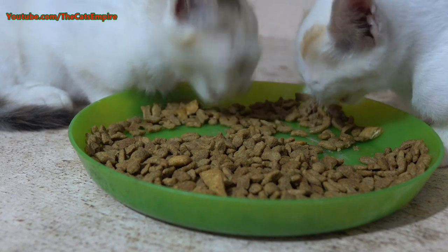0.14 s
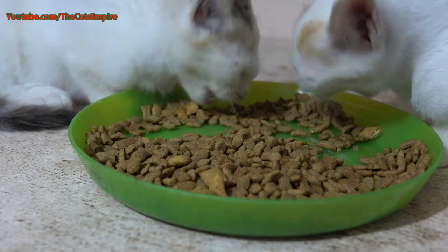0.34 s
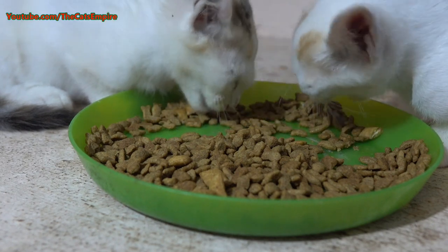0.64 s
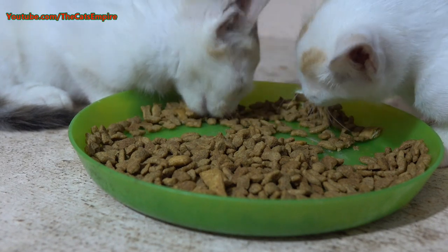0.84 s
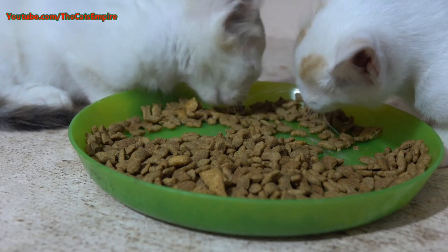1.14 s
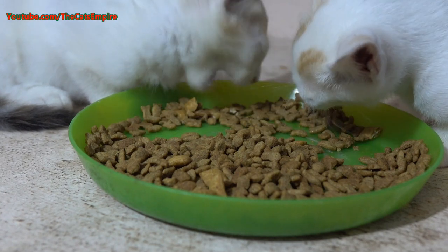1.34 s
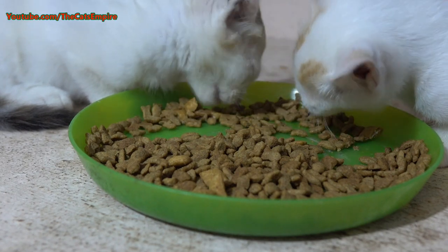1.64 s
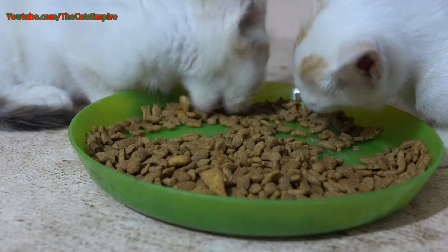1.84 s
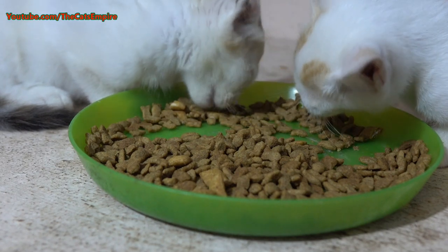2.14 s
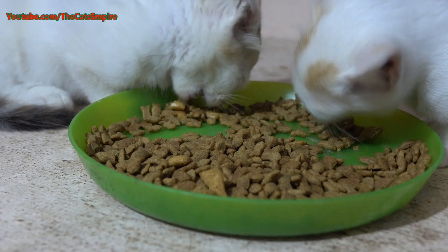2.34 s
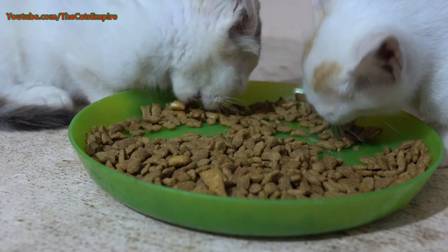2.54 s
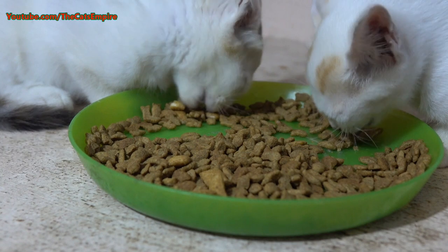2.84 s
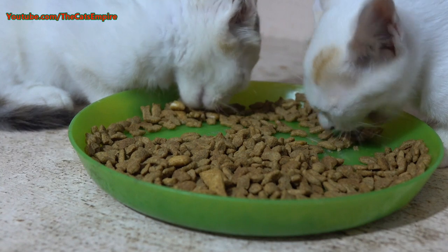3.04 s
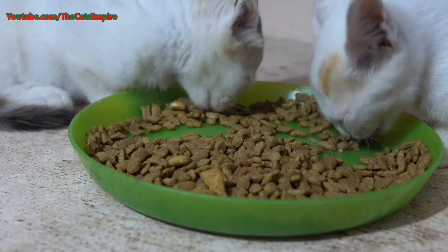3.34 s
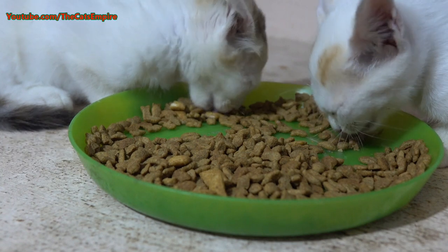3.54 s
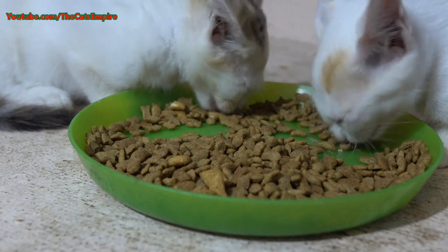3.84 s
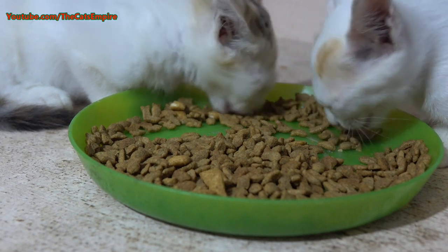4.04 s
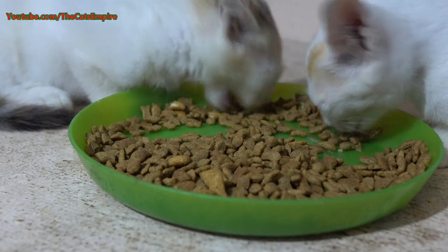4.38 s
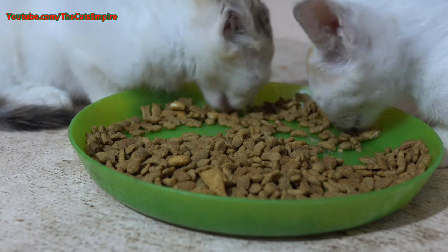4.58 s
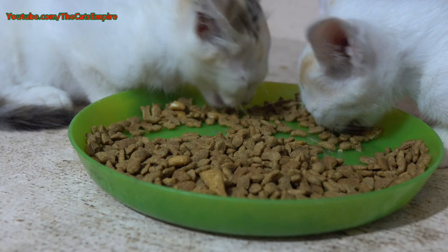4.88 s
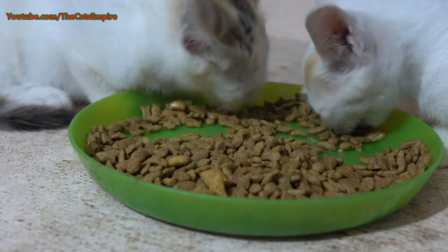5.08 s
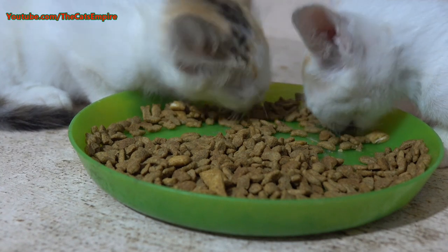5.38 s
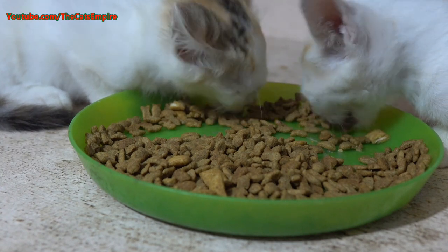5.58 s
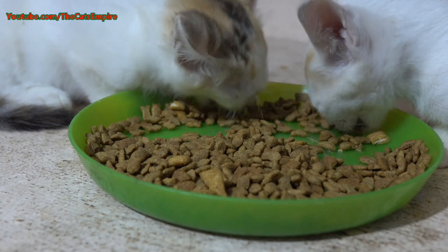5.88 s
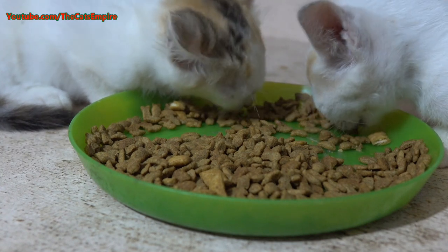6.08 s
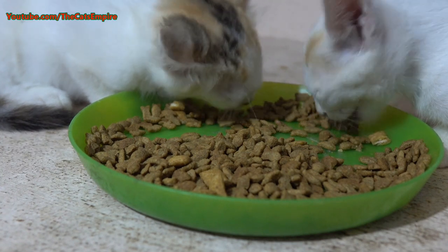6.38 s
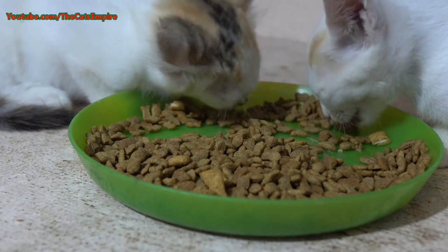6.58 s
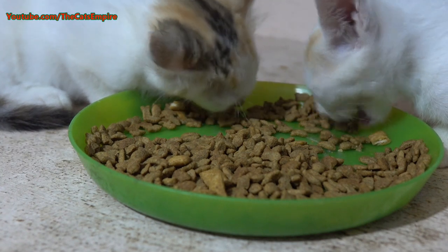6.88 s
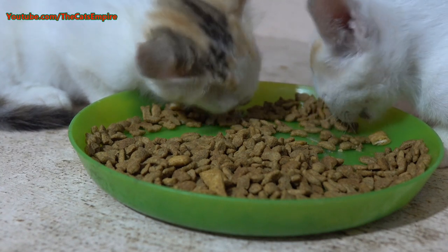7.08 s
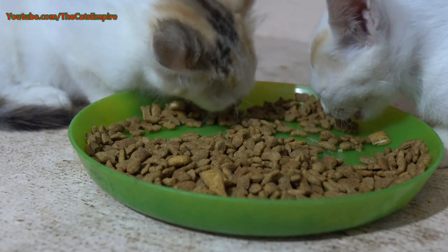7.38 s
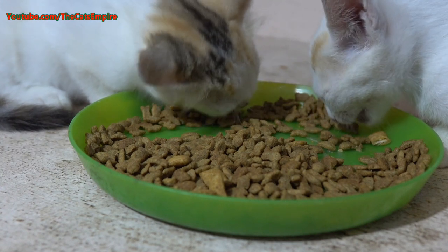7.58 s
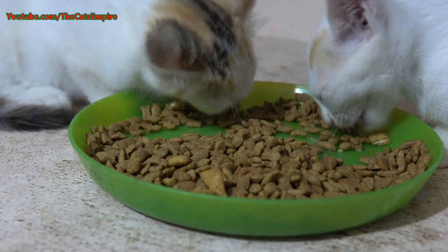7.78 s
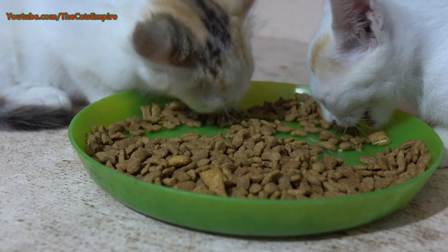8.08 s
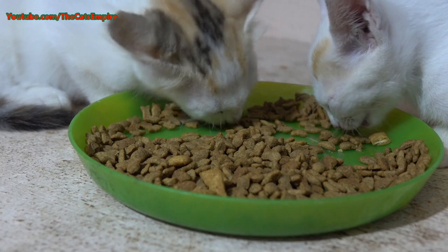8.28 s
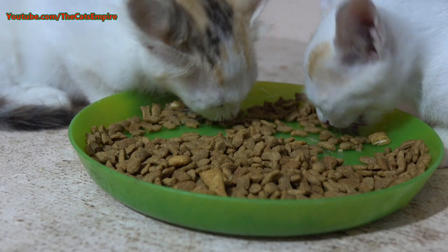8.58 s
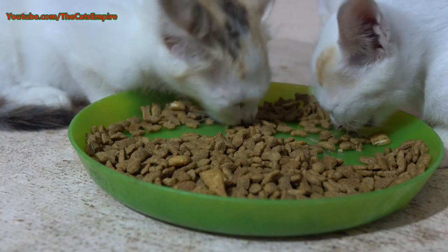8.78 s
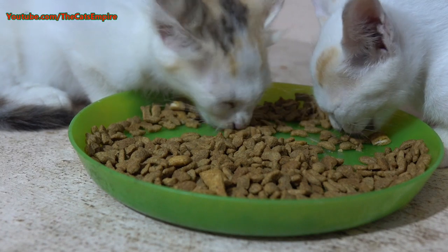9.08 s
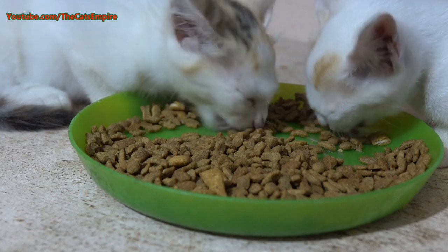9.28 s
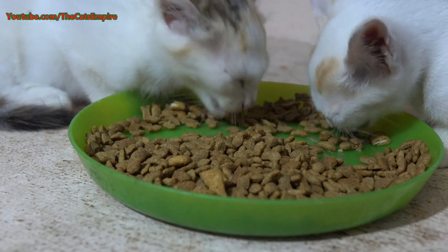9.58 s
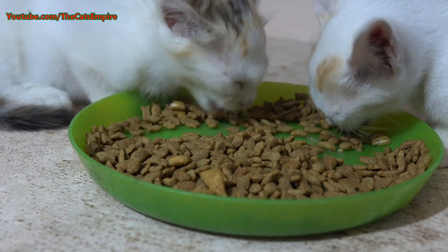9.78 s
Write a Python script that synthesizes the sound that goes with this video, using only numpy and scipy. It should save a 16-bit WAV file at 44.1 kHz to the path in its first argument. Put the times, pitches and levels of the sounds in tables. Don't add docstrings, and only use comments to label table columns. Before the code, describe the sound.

Loud, overloaded snaps of dry pellets between small teeth, gritty grinding and dull plastic plate knocks, thinning midway, then a final burst of bites.

```python
import sys
import numpy as np
from scipy import signal
from scipy.io import wavfile
from scipy.ndimage import uniform_filter1d

SR = 44100
rng = np.random.default_rng(int(sys.argv[2]) if len(sys.argv) > 2 else 0)


def int16_out(signal):
    q = np.round(np.clip(np.atleast_2d(signal).T, -1, 1) * 32767)
    wavfile.write(sys.argv[1], SR, q.astype(np.int16))


def rack_gain(trim_db):
    fader = np.asarray(trim_db, float)
    return 10 ** (fader / 20)


N = 437472

# start in seconds, peak level in dB, ring pitch in Hz,
# splinter brightness in dB.
BITES = [(0.181, 3, 3030, -22.5), (0.202, 11.5, 2900, -4.5), (0.298, 0.5, 3430, -11),
         (0.329, 10.5, 3550, -9), (0.352, 8, 2170, 0.5), (1.009, 7, 2840, -10.5), (1.37, 9, 2100, -3.5),
         (1.422, 0.5, 2800, -7), (1.484, 12, 3550, -8), (1.83, 1, 2740, -4.5), (1.882, 4, 3240, -15),
         (1.91, 9, 3760, -12), (2.2421, 9.5, 4000, -7.5), (2.2528, 12, 3980, -15.5), (2.663, 6.5, 2940, -9),
         (2.785, -2, 3000, -6.5), (3.2309, 11.5, 2404, -8.5), (5.543, 5, 4440, -11), (5.978, 4.5, 3400, -8),
         (6.352, 16, 3190, -6), (7.093, 11, 2670, 1), (7.269, 6, 2700, -13), (8.672, 7.5, 3560, -12),
         (9.226, 4, 2360, -13), (9.321, 0, 2170, -3.5), (9.349, -3, 1980, 6), (9.44, -1.5, 3170, -19),
         (9.64, 6, 2460, -16), (9.681, 7.5, 2550, -7.5), (9.743, 10.5, 2170, -5.5)]


def rms_one(x):
    return x / np.sqrt(np.mean(x ** 2) + 1e-20)


def peak_one(x):
    return x / np.abs(x).max(axis=-1, keepdims=True)


def above(x, hz):
    return signal.sosfilt(signal.butter(4, hz, "high", fs=SR, output="sos"), x)


def below(x, hz):
    return signal.sosfilt(signal.butter(4, hz, "low", fs=SR, output="sos"), x)


def at_hz(points, hz):
    curve_hz, value = np.transpose(points)
    return np.interp(np.log(hz), np.log(curve_hz), value)


def drift(rate):
    r = np.exp(-80 * np.pi * rate / SR)
    coarse = rng.standard_normal(N // 40 + 2002)
    slow = signal.lfilter([1], [1, -2 * r, r * r], coarse)[2000:]
    return np.interp(np.arange(N) / 40, np.arange(len(slow)), rms_one(slow))


def ring(clicks, hz, t60):
    r, w = np.exp(-np.log(1000) / (t60 * SR)), 2 * np.pi * hz / SR
    return signal.lfilter([0, np.sin(w)], [1, -2 * r * np.cos(w), r * r], clicks + 1e-18)


def bands(x, spectrum):
    for k, low in enumerate(22 * np.sqrt(2) ** np.arange(19)):
        sos = signal.butter(2, [low, low * np.sqrt(2)], "band", fs=SR, output="sos")
        hz = low * 1.19
        if spectrum[0][0] < hz < spectrum[-1][0]:
            gain = (-1) ** k * rack_gain(at_hz(spectrum, hz))
            yield hz, gain * signal.sosfilt(sos, x + 1e-18)


def coloured(x, spectrum):
    return sum(band for hz, band in bands(x, spectrum))


def stroke(s, held, level_db, rise_db_s, fall_db_s):
    since = np.arange(0, N + 128, 128)[:, None] / SR - s
    building = rise_db_s * np.maximum(-since - held / 2, 0)
    easing = fall_db_s * np.maximum(since - held / 2, 0)
    power = np.sum(rack_gain(2 * (level_db - building - easing)), axis=1)
    return np.interp(np.arange(N) / 128, np.arange(len(since)), power)


def hush():
    # pitch in Hz, density in dB per Hz.
    room_colour = [(60, -2.5), (120, -14.5), (450, -12), (1000, -17.5), (4000, -19.5), (8000, -14.5),
                   (12000, -22), (15800, -27)]
    hiss_hz, mains_hz = 7400, 100
    white = rng.standard_normal(N)
    noise = sum(band * rack_gain(4.4 * drift(5.3)) for hz, band in bands(white, room_colour))
    narrow = ring(ring(white, hiss_hz, .012), hiss_hz, .012)
    hiss = rack_gain(-76 + 2 * drift(3)) * rms_one(narrow)
    hum = rack_gain(-80 + 2.4 * drift(2)) * np.sin(2 * np.pi * mains_hz * np.arange(N) / SR)
    return rack_gain(-64) * rms_one(noise) + hiss + hum


def rustle():
    # time in seconds, level in dB.
    busy = [(0.0, -47.5), (0.94, -53.5), (1.46, -56), (4.36, -47), (4.62, -65.5), (5.17, -56), (5.31, -47),
            (6.44, -59), (6.93, -59), (7.21, -39.5), (7.46, -53), (8.67, -49.5), (9.2, -57), (9.92, -42)]
    white = rng.standard_normal(N)
    tongue = sum(rms_one(ring(white, hz, .006)) * rack_gain(7 * drift(9)) for hz in (1100, 2300, 3400, 4400))
    fur = below(above(white, 1100), 4900)
    brush = .3 * fur + .3 * rms_one(below(above(tongue, 900), 5200))
    air = rack_gain(-24.0 + 4.0 * drift(5)) * below(above(white[::-1], 7000), 9500)
    air += rack_gain(-31.5 + 4.0 * drift(5)) * above(white, 11500)
    level_db = np.interp(np.arange(N) / SR, *np.transpose(busy)) - 6.5
    return (rms_one(brush) * rack_gain(6.5 * drift(36)) + air) * rack_gain(level_db)


def grains(per_s, spread_db):
    sizes = rack_gain(spread_db * np.minimum(rng.exponential(1, N), 4)) * np.sign(rng.random(N) - .5)
    return sizes * (rng.random(N) < per_s / SR)


def rattle(per_s, span_hz, turns, count=6):
    low, high = span_hz
    clicks, dealt = grains(per_s, spread_db=2.8), rng.integers(0, count, N)
    rings = np.zeros(N)
    for k, hz in enumerate(np.geomspace(low, high, count)):
        rings += ring(clicks * (dealt == k) * rack_gain(5.5 * drift(5)), hz, turns / hz)
    tick = below(above(clicks, low), min(2.5 * low, 14000))
    return rms_one(below(above(rings, low * .8), high * 1.1) + .7 * tick)


def grinding():
    # middle in seconds, hold in seconds, crumb level in dB,
    # level in dB of pellets sliding on the plate.
    chews = [(0.03, 0.13, -39.5, -57), (0.672, 0.13, -37, -32.5), (1.28, 0.29, -44, -37),
             (1.7, 0.15, -55, -52), (1.81, 0.1, -30, -31), (2.13, 0.11, -42.5, -46.5),
             (5.266, 0.015, -35.5, -32), (2.57, 0.18, -45.5, -71.5), (3.06, 0.065, -31, -36),
             (3.492, 0.032, -39.5, -52.5), (3.592, 0.0068, -51.5, -30.5), (3.761, 0.049, -36.5, -43),
             (3.942, 0.037, -31, -42), (4.17, 0.13, -46.5, -57), (4.352, 0.17, -42.5, -44),
             (4.968, 0.018, -41, -55), (5.227, 0.033, -33.5, -29.5), (5.37, 0.012, -39, -34.5),
             (5.678, 0.017, -39, -43), (5.921, 0.072, -48, -76), (6.117, 0.49, -46.5, -50),
             (6.6, 0.19, -39.5, -44), (7.0, 0.054, -50.5, -54), (7.569, 0.017, -54.5, -53.5),
             (7.75, 0.17, -48, -77), (8.25, 0.19, -54, -50), (8.078, 0.029, -42, -39),
             (8.429, 0.21, -70, -75), (8.85, 0.034, -67, -31.5), (8.915, 0.031, -33, -26),
             (8.99, 0.012, -33, -40), (9.062, 0.013, -42, -27.5), (9.16, 0.03, -33, -24)]
    s, held, crumb_db, slide_db = np.transpose(chews)
    bite_s, bite_db = np.transpose(BITES)[:2]
    rise_db_s, fall_db_s = 500, 360
    debris = stroke(bite_s + 0.023, 0, bite_db, 3000, 200.5)
    crush = stroke(s, held, crumb_db, rise_db_s, fall_db_s) + rack_gain(2 * -45) * debris
    shove = stroke(s, held, slide_db, rise_db_s, fall_db_s) + rack_gain(2 * -47) * debris
    clump = rack_gain(5 * drift(22))
    dust = rattle(200 * clump, (7500, 13500), turns=25, count=3)
    crumbs = rattle(1000 * clump, (2600, 5900), turns=7) + rack_gain(-24) * dust
    slides = rattle(3000 * np.sqrt(clump), (1050, 2700), turns=8)
    idle_crumb_db, idle_slide_db = -66, -74
    crumbs = rack_gain(-4.5) * crumbs * np.sqrt(crush + rack_gain(2 * idle_crumb_db))
    return crumbs + rack_gain(-8.5) * slides * np.sqrt(shove + rack_gain(2 * idle_slide_db))


def plate(size=260):
    # start in seconds, peak level in dB,
    # thud into the floor in dB, extra ring of the rim in dB.
    knocks = [(0.036, -51, -28, 2.5), (0.18, -24, -64.5, -12), (0.294, -26, -24, -4),
              (0.35, -19, -5.5, -1.5), (0.692, -34, -43, -3.5), (1.005, -27, -20.5, -9),
              (8.088, -41, -33, -22), (1.33, -32, -44.5, 4.5), (1.368, -23, -22.5, -4.5),
              (1.418, -29.5, -13, -1.5), (1.483, -29, -45, -3), (1.828, -30.5, -71, -9.5),
              (1.9, -30, -23, 6), (2.239, -32, -43, -2), (2.661, -28.5, -21, 6.5), (2.78, -32.5, -44, -8),
              (3.23, -23, -29.5, 8), (4.284, -55, -40, 10), (4.755, -45, -38, 7.5),
              (5.538, -41, -4.5, -1.5), (6.349, -21.5, 0.5, 0.5), (6.641, -38.5, -11, -6.5),
              (7.092, -23, 1, -6), (7.263, -25.5, -19.5, -3.5), (8.669, -31.5, -33, 7.5),
              (8.814, -37.5, -9.5, 4.5), (9.225, -30, -7, -4), (9.344, -21.5, -5, 1.5),
              (9.679, -27.5, 7.5, 3.5), (9.74, -19, -53, -5)]
    # pitch in Hz, level in dB, t60 in seconds.
    modes = [(251.4, -5, 0.29), (260, -6, 0.12), (306, -6, 0.15), (440, -8, 0.05), (496, -7.5, 0.27),
             (567, -3, 0.11), (707, 0, 0.044), (1090, -7.5, 0.32)]
    s, peak_db, thud_db, rim_db = np.transpose(knocks)
    at = np.round((s + .003) * SR).astype(int)
    share_db = rng.normal(0, 2.8, (len(s), len(modes)))
    body, push, thump = np.zeros((3, N))
    for k, (hz, level_db, t60) in enumerate(modes):
        clicks = np.zeros(N)
        clicks[at] = rack_gain(peak_db + level_db - 3.0 + share_db[:, k] + rim_db * (k < 2))
        body += ring(clicks, hz, t60) * (1 + .6 * drift(30))
    scuff = rng.standard_normal((len(s), size)) * np.hanning(size)
    thump[at[:, None] + np.arange(size)] = rack_gain(peak_db - 11.5)[:, None] * scuff
    body = above(body + ring(thump, 450, 0.02), 190)
    push[at] = rack_gain(peak_db + thud_db)
    thud = 0.2 * ring(push, 96, 0.015) + ring(push, 97, 0.047) + 0.13 * ring(push, 32, 0.066)
    body = body + rack_gain(1.5) * thud
    return uniform_filter1d(body, size=31, origin=15), thump


def snaps(size=900, count=3):
    # start in seconds, peak level in dB, ring pitch in Hz,
    # splinter brightness in dB. First pieces chipped off with the lips open.
    chips = [(0.096, -9, 4900, 3), (0.603, -3.5, 3890, -23), (0.699, -10, 3660, 7.5),
             (1.264, -15.5, 3670, -4), (1.286, -3, 3130, -9.5), (1.675, -12, 5100, -5),
             (1.787, -6, 1140, -3), (1.805, -4.5, 1390, -8), (1.89, 1, 2940, -6), (2.135, -4, 4340, -9),
             (2.469, -11.5, 3970, -5), (2.742, -1.5, 4670, -15), (3.1, -6.5, 2800, -5),
             (3.328, -8, 2590, -2.5), (3.584, -15, 3990, -19), (3.593, -3.5, 4270, -7),
             (4.313, -11, 2167, 4), (6.195, -12.5, 2750, -19.5), (6.645, -5.5, 4400, 4.5),
             (7.04, -15, 1840, 1), (8.09, -7.5, 4630, -4.5), (8.918, -11.5, 1380, 8),
             (9.209, -4.5, 3770, -8), (9.301, 0.5, 1300, -6), (9.354, -4, 690, 1), (9.379, -3.5, 2430, -3),
             (9.569, -10, 3060, 8), (9.862, -11.5, 2560, -4)]
    shards = [(0.0374, -27.5, 3490.0, 25), (0.148, -23, 3530, 14), (1.2595, -13.5, 8400, -7),
              (1.8149, -4.5, 7410.0, -17), (1.9964, -17.5, 7600, 6), (2.36, -24, 4700, 7),
              (3.4602, -22, 8400, 13), (3.632, -19, 3750, 9), (4.1163, -26, 1750, -2),
              (4.252, -22.5, 5640, 6), (4.3003, -7.5, 6240, -27), (4.326, -15, 2220, 4),
              (4.9767, -22.5, 8050, -19), (5.063, -31.5, 12150, -10), (5.2928, -17, 5920.0, -19),
              (5.489, -29, 2950, 11), (6.9674, -30, 3730, 20), (7.3598, -24, 2040, 12),
              (8.2945, -32.5, 7820.0, -7), (8.9121, -32.5, 1090, 16), (9.2183, -10, 1290, -10)]
    # start in seconds, peak level in dB, ring pitch in Hz.
    gnaws = [(0.591, -17, 3870), (0.642, -19, 1180), (1.236, -17, 3430), (1.332, -16.5, 1880),
             (2.151, -12, 3320), (2.187, -8.5, 1290), (2.205, -30, 1090), (2.394, -13, 2820),
             (2.931, -5.5, 4020), (2.968, -6.5, 2970), (3.044, 0.5, 2570), (3.923, -11.5, 4720),
             (5.214, -15.5, 3250), (5.563, -1, 4800), (5.643, -15.5, 2090), (6.573, -11, 2670),
             (7.182, -14, 3340), (7.206, -5.5, 2740), (7.258, -7, 5350), (7.685, -18, 2980),
             (8.648, -7.5, 3220), (9.069, -12, 2470), (9.127, -5.5, 2080), (9.136, -10.5, 2500),
             (9.171, 0.5, 2730), (9.241, 1, 2290), (9.613, -8, 2550), (9.72, -4.5, 2870)]
    ticks = [(0.128, -12.5, 6500), (0.958, -16.5, 2280), (1.641, -25.5, 3950), (1.763, -20, 1200),
             (2.056, -19.5, 3070), (2.108, -13, 3020), (2.519, -15.5, 4600), (2.624, -22, 3180),
             (3.762, -19, 4630), (4.055, -19, 2800), (4.184, -17.5, 870), (4.202, -18, 4700),
             (4.758, -27, 980), (4.899, -19, 5600), (4.954, -22.5, 3870), (5.162, -18.5, 2320),
             (5.357, -23, 3700), (5.667, -13.5, 3640), (5.834, -22.5, 3430), (6.865, -21.5, 4080),
             (7.575, -18.5, 2350), (7.916, -23, 1300), (8.147, -23, 4330), (8.44, -17, 2930),
             (8.547, -22, 3540), (8.633, -26, 1120), (9.56, -15, 3830)]
    taps = [(0.1038, -15.5, 1670), (0.6322, -34, 1100.0), (0.6503, -13, 1160), (0.762, -24, 1170),
            (0.7792, -28, 1130), (0.8485, -33.5, 2750), (0.9477, -34, 1640.0), (0.9758, -16.5, 1950),
            (1.1873, -34, 1120.0), (1.3413, -10, 1830), (1.7334, -24, 1620), (1.7816, -16, 1170),
            (2.6537, -18, 1750), (2.7661, -10, 920), (3.509, -25, 2240.0), (3.5254, -26, 2300),
            (4.1396, -24.5, 2270), (4.3869, -25, 2280.0), (4.4133, -24, 2200), (3.972, -15.5, 2200),
            (5.4979, -23.5, 2290), (5.6815, -19, 1130), (5.8923, -23, 2600), (6.6888, -24.5, 2370),
            (7.35, -19, 2520), (7.4554, -36, 1690), (7.4641, -29.5, 2120), (7.6932, -20.5, 2750),
            (7.7893, -27, 2410.0), (7.898, -28, 1940), (7.928, -29.5, 1050), (7.9483, -40.5, 1140.0),
            (8.007, -34.5, 1100), (4.826, -39.5, 2970), (8.061, -21, 1232), (8.1423, -30, 2400),
            (8.2421, -40.5, 2500), (8.3988, -30, 1020), (8.4573, -25.5, 2080), (8.5079, -37, 2260),
            (8.6257, -30, 2280.0), (8.8318, -21, 1130), (8.8463, -28, 2250), (8.8522, -27, 1200),
            (8.8673, -21.5, 2200), (8.8955, -15, 1570), (8.9066, -16.5, 1180), (8.9818, -15.5, 1830),
            (9.0119, -19, 1310), (9.3479, 7, 2590), (9.4257, -17, 2260.0), (9.7134, -18, 2640),
            (9.8089, -9.5, 875)]
    pops = [(4.521, -32, 4800), (0.2772, -6.5, 3280), (0.6766, -27, 3880), (0.915, -26.5, 3360.0),
            (1.1793, -41, 3420.0), (1.221, -16, 3200), (1.2444, -31, 3660), (1.4939, -4, 3600),
            (1.6594, -16.5, 4040), (2.2061, -18, 3530), (2.3695, -29, 3500), (2.3872, -17, 4100),
            (2.5625, -22, 3950), (2.5908, -22, 3300), (2.607, -33, 3470.0), (2.6457, -17, 3350),
            (3.1641, -28, 2790), (3.4027, -24, 4600), (4.615, -41.5, 3580), (3.4773, -14, 3260),
            (3.4951, -19, 4310.0), (3.5004, -22, 4100), (3.7135, -21.5, 4200), (3.7928, -19, 5750.0),
            (3.8697, -28, 3950), (4.744, -44, 5000), (3.9285, -25, 3970), (4.0079, -19.5, 3340),
            (4.9681, -22, 3700), (5.2341, -11.5, 2780), (5.2678, -13, 3380), (5.3498, -27, 4370.0),
            (5.3645, -21, 3440), (5.3746, -21, 4520.0), (5.4448, -33, 4800), (5.528, -14, 3450),
            (5.7105, -29, 4760), (5.9028, -16, 3500), (5.9507, -26, 4100), (5.9558, -27, 4200),
            (6.0912, -24, 4520.0), (6.101, -22, 4530), (6.1272, -24.5, 3320), (6.5151, -28, 3750.0),
            (6.5267, -21, 5100), (6.5507, -28, 4650.0), (6.563, -22, 3450), (6.8813, -23, 3550),
            (7.1774, -16, 3490.0), (7.2128, -12.5, 3080), (7.3661, -22.5, 3260), (7.3793, -26, 3280),
            (7.4729, -31, 3580), (7.6736, -20, 3180), (7.7752, -32, 3720), (7.7965, -24.5, 3790.0),
            (8.5607, -39, 4560), (9.0887, -29, 2780.0), (9.118, -29, 3080.0), (9.1515, -22, 2800)]
    smacks = [(1.6372, -31, 10600), (1.6651, -33, 9000), (3.9744, -25, 6100), (9.505, -33, 8800),
              (4.2083, -31, 7350), (7.5433, -36, 7660), (7.867, -54, 12500), (8.1946, -36, 12800),
              (8.2192, -45, 8720), (8.3853, -42, 6950), (8.9984, -27, 8970)]
    # pitch in Hz, density in dB per Hz.
    pellet = [(290, -31), (700, -14), (1400, -9.5), (1850, 21.5), (3600, 17), (9000, 24)]
    # pitch in Hz, density in dB per Hz.
    splinter_colour = [(5000, 0), (9500, -1), (16000, 0)]

    events = BITES + chips + shards
    for rows, kind_db in (gnaws, -22), (ticks, -7.5), (taps, -16), (pops, -6.5), (smacks, 18.5):
        events = events + [tuple(row) + (kind_db,) for row in rows]
    s, peak_db, pitch_hz, bright_db = np.transpose(events)
    small_db = np.minimum(peak_db, 0)

    t = np.arange(size) / SR
    lasts = 0.0013 * rack_gain(0.18 * peak_db)[:, None]
    tear, second = rng.standard_normal((2, len(s), size)) * np.exp(-t / lasts)
    t60 = np.minimum(15.0 / pitch_hz, .0055) * rack_gain(-0.15 * np.maximum(peak_db + 3.0, 0))
    rung = np.array([ring(a, hz, d) + 0.28 * ring(b, hz * 1.313, d * 0.83)
                     for a, b, hz, d in zip(tear, second, pitch_hz, t60)])
    broad = np.array([ring(a, hz, 0.87 / hz) for a, hz in zip(coloured(tear, pellet), pitch_hz)])
    splinter = peak_one(below(coloured(second, splinter_colour), 14000))
    dull = below(splinter, 10000)
    splinter = dull + rack_gain(0.4 * small_db)[:, None] * (splinter - dull)

    crack = peak_one(above(rung, 690))
    crack = crack + rack_gain(-3.5 + 0.3 * small_db)[:, None] * peak_one(above(broad, 560))
    crack = peak_one(below(crack, 8800)) + rack_gain(bright_db - 1.0 + 0.18 * small_db)[:, None] * splinter
    escaping = rack_gain(0.3 * small_db)
    direct, to_walls = np.zeros(N + size), np.zeros((count, N + size))
    for k, at in enumerate(np.round(s * SR).astype(int)):
        to_walls[k % count, at:at + size] += rack_gain(peak_db[k] - 10.0) * escaping[k] * crack[k]
        direct[at:at + size] += rack_gain(peak_db[k] - 4.0) * crack[k]
    return direct[:N], to_walls[:, :N]


def room(tracks, size=13000):
    # pitch in Hz, t60 in seconds.
    room_t60 = [(300, 0.57), (1040, 0.12), (2760, 0.11), (7280, 0.18), (14000, 0.21)]
    t = np.arange(size) / SR
    flat = [(200, 0), (16000, 0)]
    echoes = rng.standard_normal((len(tracks), size)) * np.clip((t - .0015) / 0.0018, 0, 1)
    tails = sum(band * np.exp(-np.log(1000) * t / at_hz(room_t60, hz)) for hz, band in bands(echoes, flat))
    tails = signal.lfilter([1], [1, -.5], tails)
    tails = rms_one(tails) / np.sqrt(size)
    return signal.fftconvolve(tracks, tails, axes=1)[:, :N].sum(axis=0)


def jolts():
    # start in seconds, length in seconds, level in dB.
    shakes = [(0.07, 0.51, -36.5), (0.626, 0.084, -38.5), (0.941, 0.16, -34), (1.268, 0.34, -36),
              (1.83, 0.16, -36), (2.23, 0.04, -48), (2.63, 0.051, -41), (3.056, 0.085, -45),
              (3.206, 0.069, -36.5), (5.222, 0.12, -46), (5.556, 0.061, -37.5), (6.313, 0.11, -37),
              (6.6, 0.072, -40), (7.053, 0.13, -41.5), (7.193, 0.14, -36), (8.633, 0.11, -41),
              (9.214, 0.25, -44), (9.556, 0.038, -38), (9.631, 0.32, -38.5)]
    s, length, level_db = np.transpose(shakes)
    sos = signal.butter(2, [12, 45], "band", fs=SR, output="sos")
    rumble = rms_one(signal.sosfilt(sos, rng.standard_normal(N)))
    still_floor_db = -70
    power = stroke(s + length / 2, length * .6, level_db - 9.0, 500, 320) + rack_gain(2 * still_floor_db)
    return np.sqrt(power) * rack_gain(0.73 * drift(6.1)) * rumble


def sniffs():
    # start in seconds, length in seconds, level in dB.
    whistles = [
        (3.98, .18, -66),
        (8.71, .16, -66),
        (5.09, .1, -68),
    ]
    nose_hz = 12500
    air = rms_one(ring(ring(rng.standard_normal(N), nose_hz, .004), nose_hz, .004))
    swell = np.zeros(N)
    for s, length, level_db in whistles:
        at, n = round(s * SR), round(length * SR)
        swell[at:at + n] = rack_gain(level_db) * np.sqrt(np.hanning(n))
    return air * swell


def gulps():
    # start in seconds, length in seconds, level in dB, start pitch in Hz, end pitch in Hz.
    swallows = [
        (5.206, 0.071, -34, 145, 134),
        (5.351, 0.077, -52, 158, 147),
        (5.552, 0.12, -39.5, 153, 117),
        (5.678, 0.071, -51, 147, 140),
        (5.994, 0.15, -55, 190, 180),
        (8.372, 0.078, -49.5, 271, 311),
        (8.507, 0.11, -46.5, 357, 301),
        (9.125, 0.068, -39, 137, 122),
    ]
    out, wobble = np.zeros(N), rack_gain(.3 * drift(30))
    for s, length, level_db, start_hz, end_hz in swallows:
        at, n = round(s * SR), round(length * SR)
        glide_hz = np.linspace(start_hz, end_hz, n) * wobble[at:at + n]
        wave = np.sin(2 * np.pi * np.cumsum(glide_hz) / SR)
        hum = np.tanh(2.3 * wave + 0.4)
        out[at:at + n] += rack_gain(level_db - 6.0) * np.hanning(n) * hum
    return above(out, 50) * rack_gain(2.5 * drift(35))


def microphone(x):
    # pitch in Hz, width in Hz, gain in dB.
    capsule = [(4400, 6900, 1.5), (6900, 800, -5), (10000, 860, -1)]
    for hz, width_hz, gain_db in capsule:
        a, w, g = np.tan(np.pi * width_hz / SR), -2 * np.cos(2 * np.pi * hz / SR), rack_gain(gain_db / 2)
        x = signal.lfilter([1 + a * g, w, 1 - a * g], [1 + a / g, w, 1 - a / g], x)
    return x


def scene():
    cracks, to_walls = snaps()
    ground = grinding()
    body, thump = plate()
    to_walls[0] += rack_gain(-5.5) * ground
    to_walls[1] += rack_gain(4.0) * thump
    eating = cracks + ground + body + gulps() + sniffs() + rustle()
    mix = eating + rack_gain(-6.0) * room(to_walls) + hush() + jolts()
    return mix[None]


def band_limit(x):
    return signal.sosfilt(signal.butter(12, 16590, fs=SR, output="sos"), x)


def record(dry):
    clipped = np.clip(microphone(dry), -1, 1)
    top_cut = signal.cheby2(12, 30, 15700 * 1.04, fs=SR, output="sos")
    return band_limit(signal.sosfilt(top_cut, clipped))


dry = scene()
out = record(dry)
int16_out(out)
```